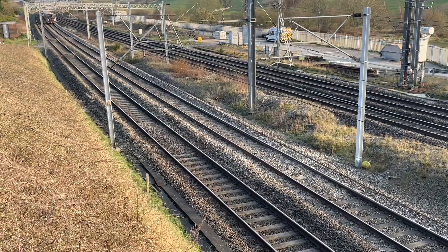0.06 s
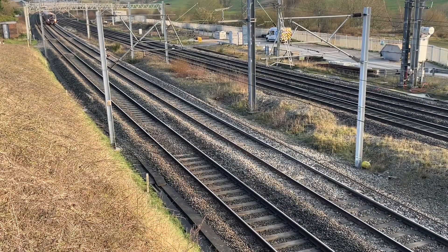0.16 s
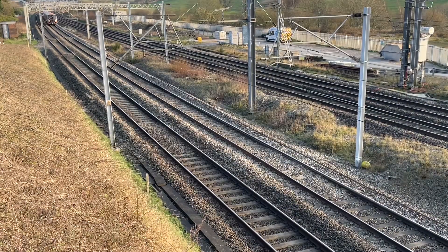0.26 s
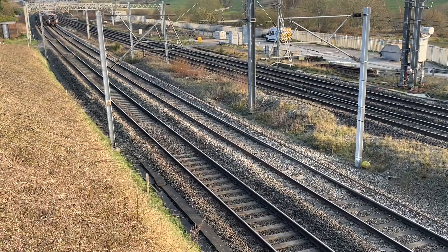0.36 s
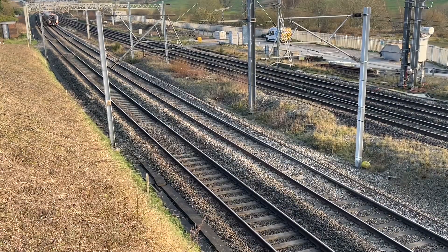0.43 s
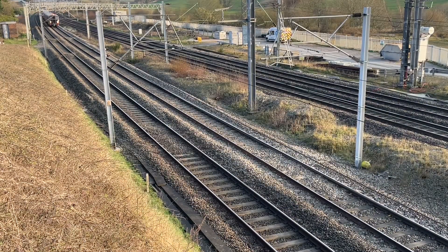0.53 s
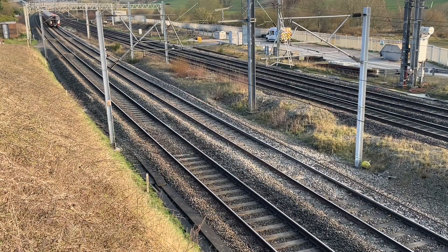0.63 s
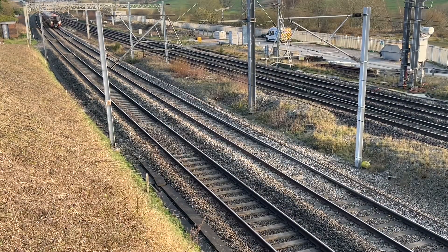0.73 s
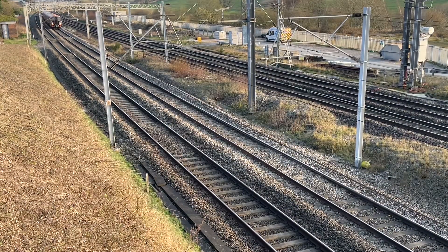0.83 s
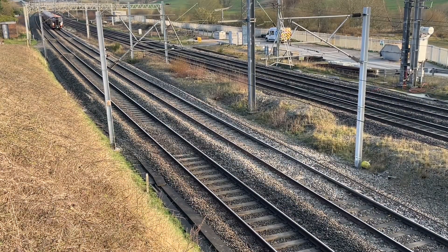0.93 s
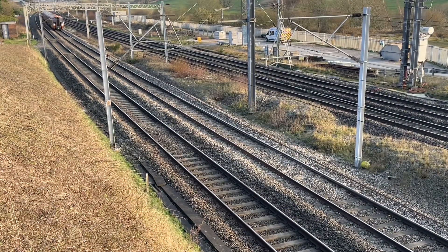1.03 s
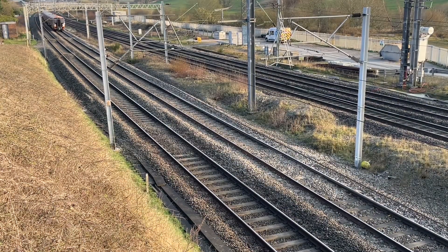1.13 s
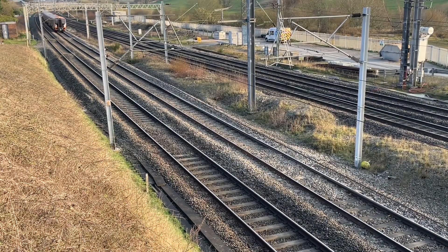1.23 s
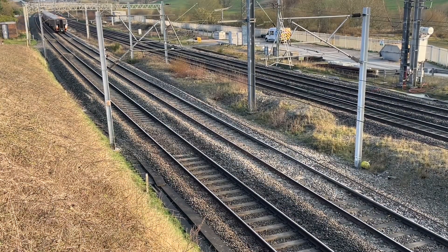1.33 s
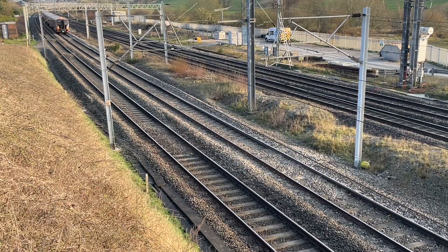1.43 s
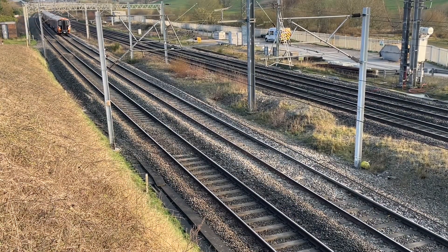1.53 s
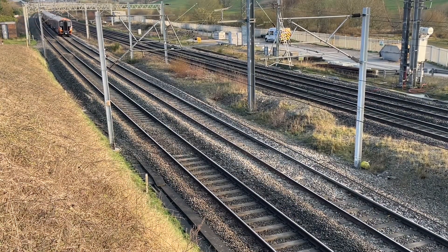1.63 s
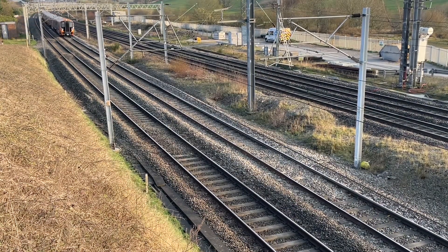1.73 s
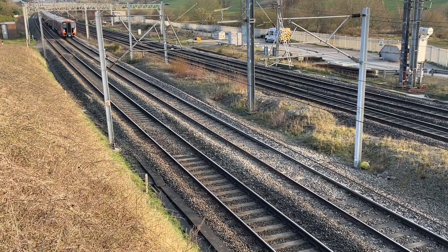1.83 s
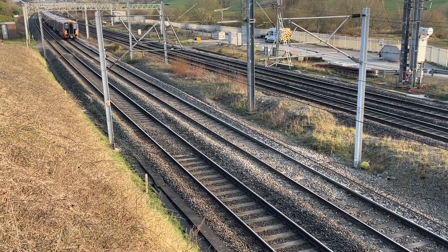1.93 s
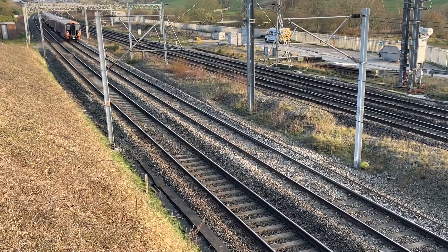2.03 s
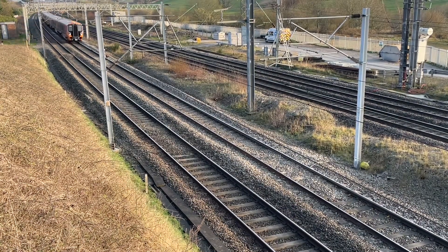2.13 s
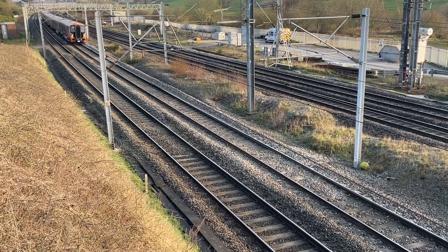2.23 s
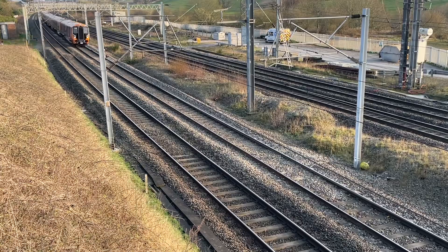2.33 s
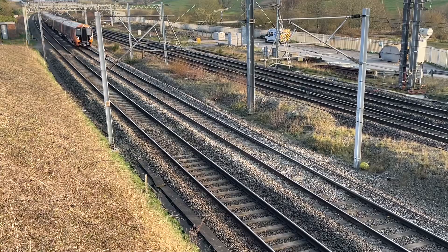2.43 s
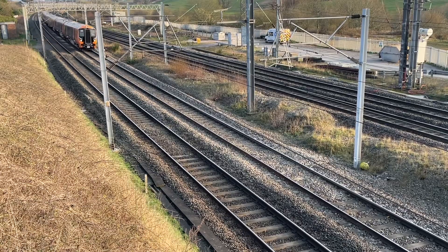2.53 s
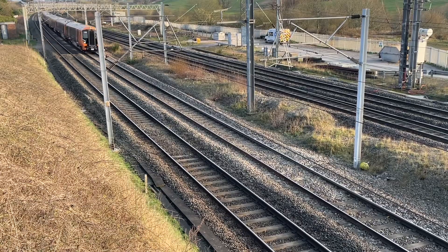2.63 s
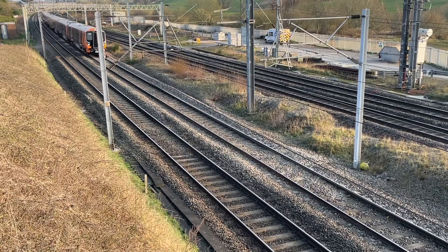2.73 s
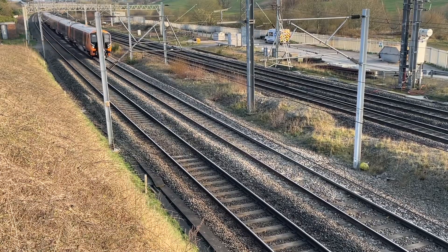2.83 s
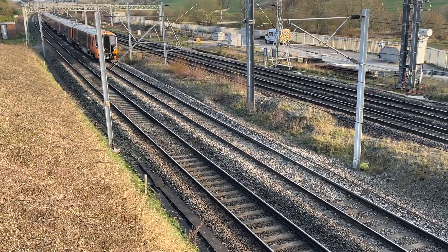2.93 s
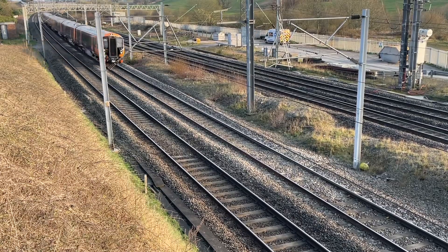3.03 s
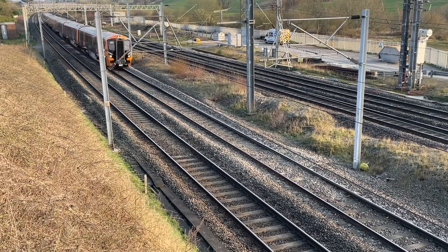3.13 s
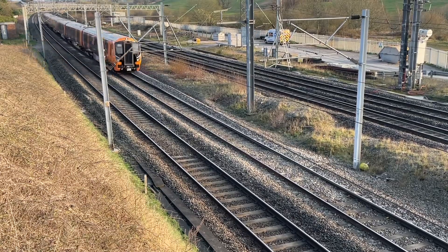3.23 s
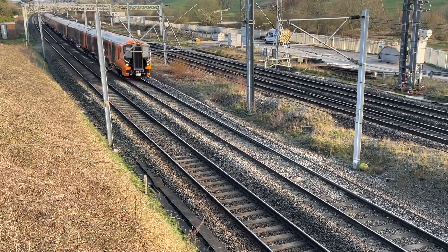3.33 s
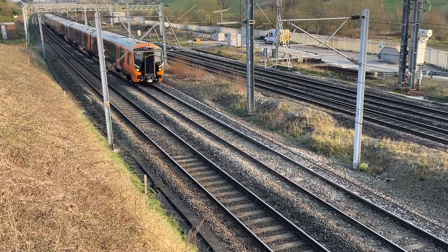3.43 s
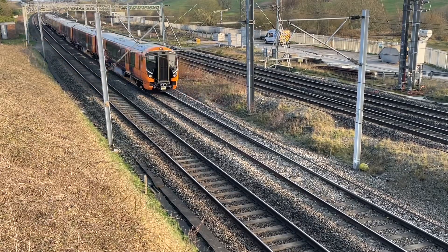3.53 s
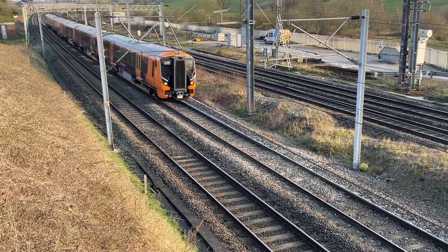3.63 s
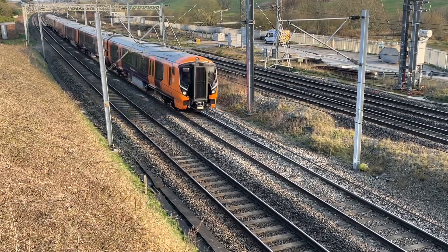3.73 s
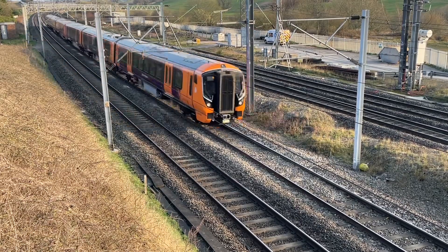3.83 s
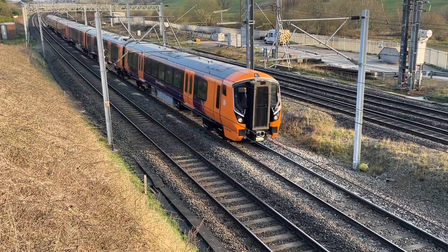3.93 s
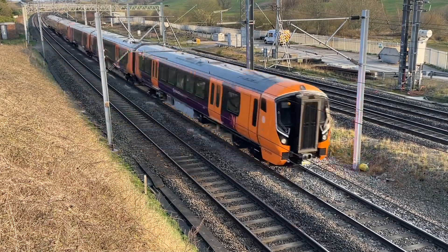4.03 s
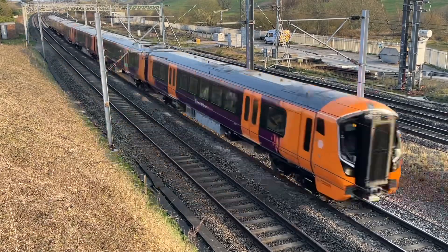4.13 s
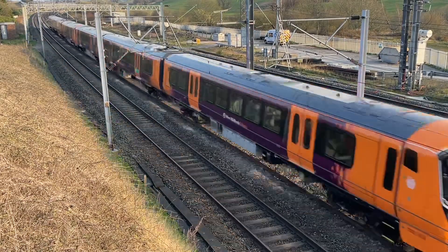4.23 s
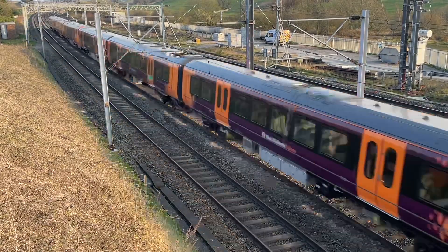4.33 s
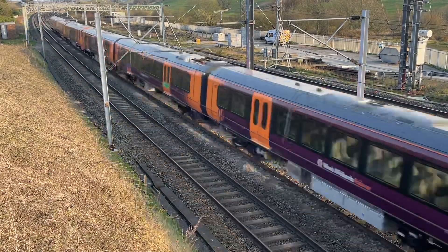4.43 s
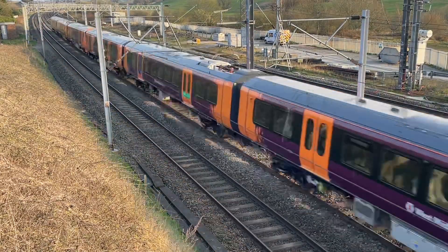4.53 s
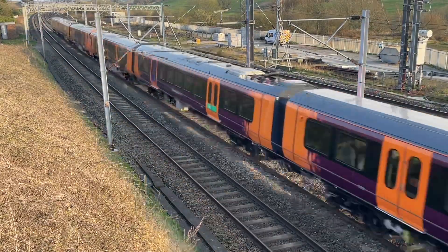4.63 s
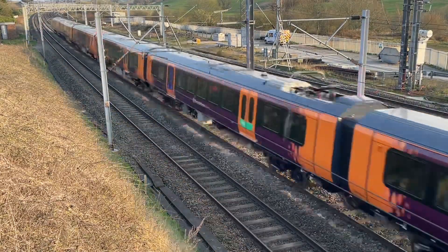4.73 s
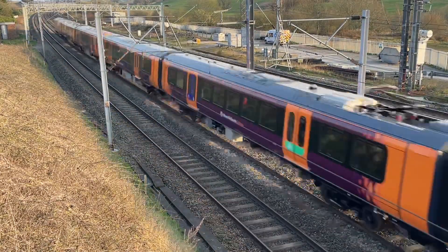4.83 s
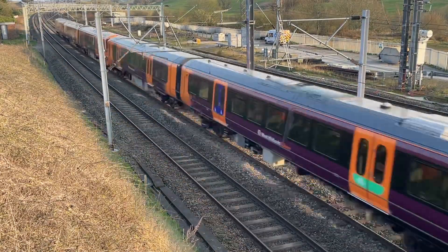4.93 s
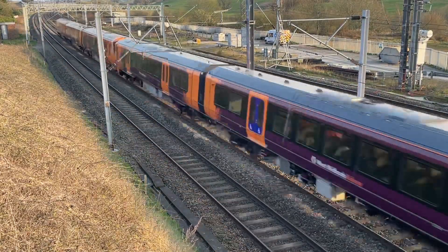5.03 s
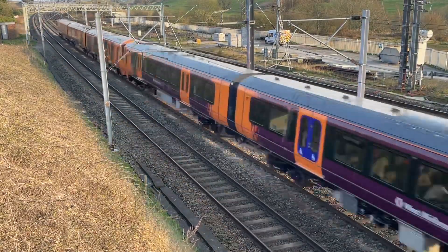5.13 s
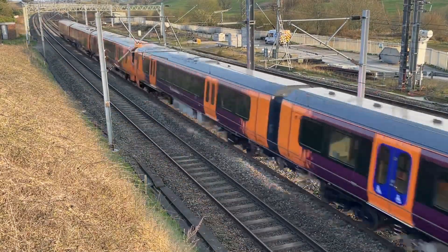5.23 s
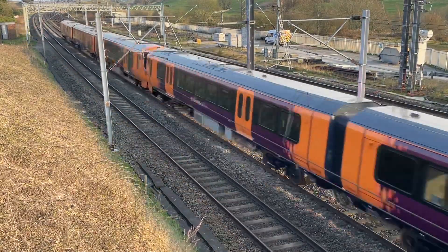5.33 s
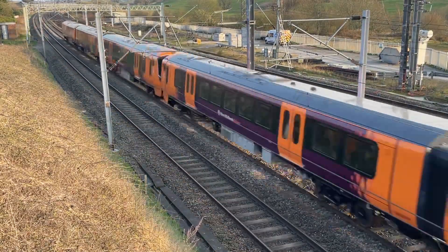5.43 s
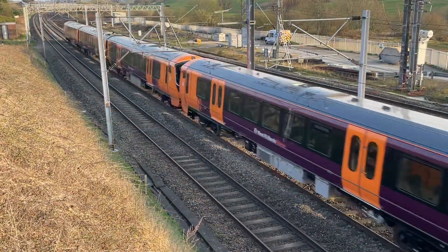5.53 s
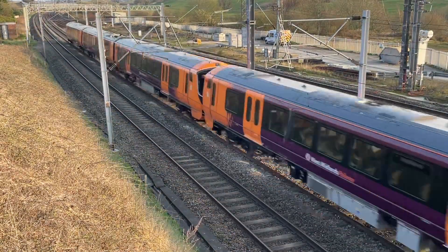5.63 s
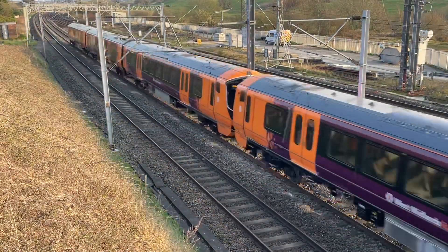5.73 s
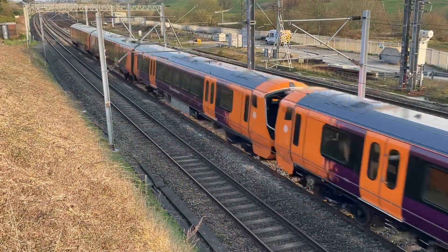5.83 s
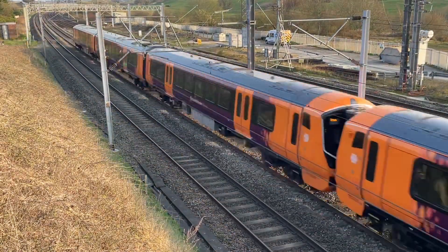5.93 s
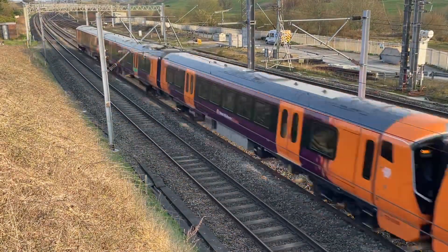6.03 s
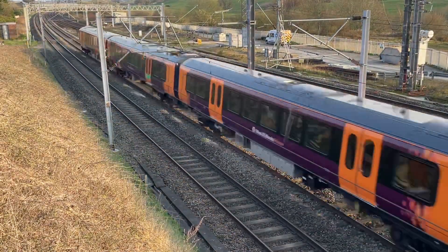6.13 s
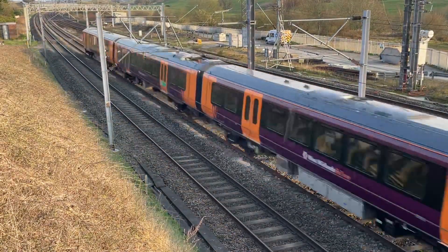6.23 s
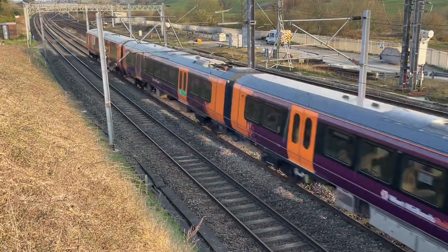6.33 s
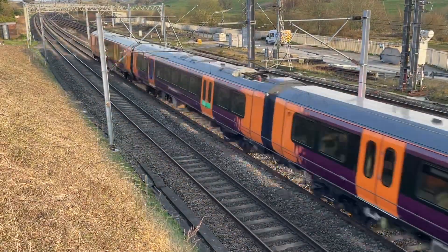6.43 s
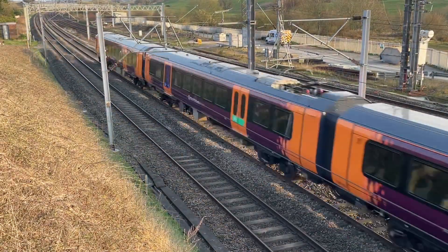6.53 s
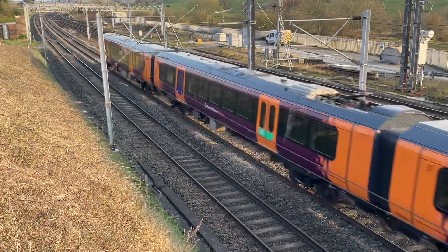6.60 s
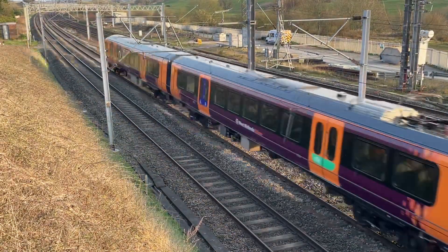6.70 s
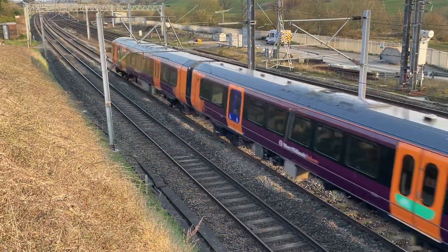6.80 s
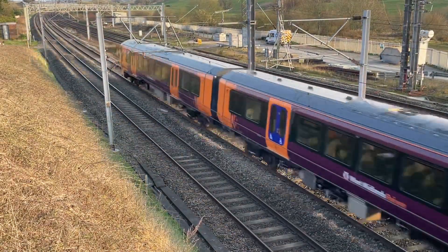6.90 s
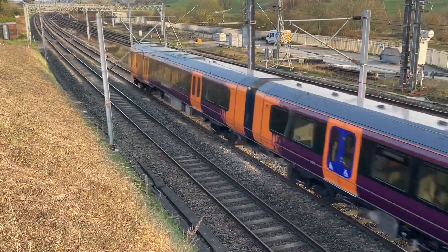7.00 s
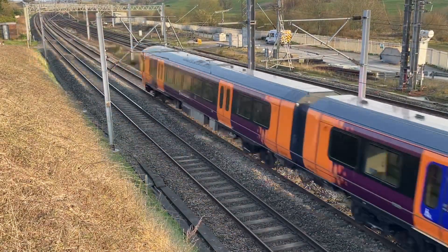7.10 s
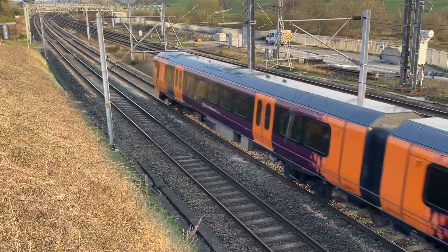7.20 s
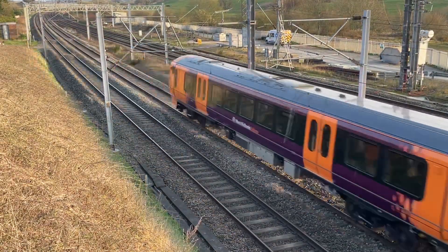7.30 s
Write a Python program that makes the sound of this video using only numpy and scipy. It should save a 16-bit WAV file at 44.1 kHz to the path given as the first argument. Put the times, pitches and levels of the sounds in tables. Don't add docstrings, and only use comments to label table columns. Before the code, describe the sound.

Mono, outdoors, in a field close beside a straight track. From 0 to 1.9 s it is quiet: a distant soft rolling rush, thin high singing in the rails, a faint wavering whistle in the first second, tiny falling bird calls near 0.3, 0.8 and 1.4 s, and low puffs of wind on the microphone. Around 2 s short falling metallic zips run along the rail; at 2.3-2.5 s a cluster of hollow clanks rings out. The roar rises, with short bursts of electric whine. A denser, brighter clatter comes at 3.5-3.7 s, with a last ring near 4.05 s, as tones slip slightly lower. From 4.2 s the train roars alongside, loud and broadband, with whine, wheel hiss and rumble swelling as bogies pass. Slipstream thumps heavily, strongest at 4.2-5 s, then more lightly. The roar stays strong, with uneven swells, until it stops at about 7.4 s, still passing.

```python
import sys
import numpy as np
from scipy import signal
from scipy.fft import rfft, irfft, next_fast_len
from scipy.io import wavfile
from scipy.ndimage import uniform_filter1d, map_coordinates

SR = 44100
rng = np.random.default_rng(int(sys.argv[2]) if len(sys.argv) > 2 else 0)


def ratio(d):
    e = np.asarray(d, float) / 20
    return 10 ** e


def unload_audio(sound):
    columns = np.transpose(np.atleast_2d(sound))
    steps = np.round(np.clip(columns, -1, 1) * 32767)
    wavfile.write(sys.argv[1], SR, steps.astype(np.int16))


N = 324576
HOP = 256

# time in seconds, nearness (0 far, 1 closing in, 2 alongside), roar in dB.
APPROACH = [(0, 0.12, -45), (.74, 0.22, -43), (1.5, 0.39, -41), (2.25, 0.6, -37.5), (2.55, 0.58, -35),
            (3.2, 0.78, -32.5), (3.5, 1.02, -30), (3.7, 0.91, -26.5), (4.05, 1.54, -25), (4.25, 1.66, -21),
            (4.5, 1.67, -19), (4.84, 1.93, -18.5), (5.25, 2.06, -17.5), (5.75, 2.06, -20),
            (6.08, 1.84, -21.5), (6.7, 1.76, -17), (7.1, 2.2, -19), (7.36, 2.8, -20.5)]
ROLLING_BANDS = [
    (90, 400),
    (400, 2600),
    (2600, 5200),
    (5200, 12500),
    (13200, 15500),
]
# level in dB far, closing in, alongside.
BAND_LEVELS = [
    (-6, -3.5, -7.5),
    (0.5, -0.5, 0),
    (-19, -14, -10),
    (-32, -17.5, -18),
    (-48, -47.5, -44.5),
]
# frequency in Hz, dB per Hz far, closing in, alongside.
ROLLING_COLOUR = [(40, -100, -92, -78), (85, -80, -75, -43.5), (134, -66, -52.5, -49), (252, -73.5, -59, -54.5),
                  (360, -72, -62.5, -55), (580, -71, -63, -52), (694, -73.5, -65, -55.5),
                  (815, -77.5, -62.5, -50), (1190, -75, -66.5, -51), (1280, -83, -69.5, -51),
                  (1855, -82, -65, -56), (1850, -86, -72.5, -58), (2390, -79.5, -71, -57.5),
                  (2770, -93, -69, -64),
                  (3250, -89, -73.5, -64), (3700, -100, -79, -62.5), (4200, -91.5, -67, -61),
               (4520, -101, -74.5, -60), (4930, -108, -84.5, -65.5), (5840, -104, -79.5, -70.5),
               (7250, -110, -91, -72), (9640, -110, -90.5, -81), (10650, -110, -100, -86.5),
               (11900, -109, -104, -94.5), (12900, -122, -114, -105), (14300, -115, -107, -100),
               (15700, -116, -108, -99)]
# frequency in Hz, width in Hz, level in dB over the noise.
RAIL_SONG = [(438, 40, 4), (2196, 38, 7), (2910, 55, 8), (6500, 60, 9), (7130, 60, 11), (7840, 150, 3),
             (8400, 100, 0), (8640, 130, 5), (9900, 280, 5), (9660, 80, 8), (10200, 80, 16),
             (10840, 68, 17), (11500, 200, 11), (13900, 90, 7)]
# time in seconds, frequency in Hz, width in Hz,
# level in dB over the roar, length in seconds.
BOGIE_BLOOMS = [(2.52, 2280, 250, 6, .1), (3.62, 2300, 600, 5, .12), (3.95, 9400, 350, 7, .4),
                (3.949, 7560, 300, 6, .35), (3.9, 6050, 600, 2, .5), (4.5, 201, 80, 5, .18),
                (4.92, 1450, 300, 2, .15), (5.6, 1420, 350, 4, .22), (6.75, 1450, 300, 4.5, .35),
                (5.4, 850, 140, 3, .2), (5.9, 850, 140, 1, .2), (7.0, 585, 100, 4, .4),
                (4.75, 580, 100, 3, .3), (7.15, 820, 100, 4, .12)]
# time in seconds, hiss swell in dB.
WHEEL_PASSES = [(4.05, -.5), (4.26, 2), (4.47, -.5), (4.86, 2.5), (5.1, 0), (5.3, -1), (5.62, 1.5),
                (5.85, -1), (6.12, 2), (6.35, -.5), (6.66, 1), (7.05, 0), (7.36, 4)]
# time in seconds, rumble swell in dB.
FRAME_PASSES = [(4.25, 4.5), (4.52, 2), (5.05, 2), (5.45, -3.5), (5.84, 2.5), (6.6, -2.5), (6.799, -1)]
# frequency in Hz approaching, in Hz alongside,
# level in dB under the roar far, closing in, alongside.
WHINE_TONES = [(585, 568, -30, -35, -23), (615.6, 597, -41, -18.5, -15.5), (840, 813, -28, -17, -40),
               (1235, 1179, -17.5, -15, -18), (2320, 2222, -19, -39, -17), (2400, 2347, -32, -23, -23)]
# time in seconds, lift in dB, half length in seconds.
MOTOR_LIFTS = [(2.4, 5, 0.35), (3.324, 8.5, .1), (4.4, 3.5, 0.53), (4.9, 0, .2), (6.1, 4, 0.23),
               (7.199, 1, 0.32)]
# time in seconds, level in dB, half length in seconds.
SING_BURSTS = [(2.495, -41, .03), (2.75, -39, .035), (2.87, -37, .03), (2.94, -41, .025), (3.03, -41, .02),
               (3.09, -42, .015), (3.19, -39, .025), (3.29, -38, .022), (3.35, -39, .015), (3.41, -40, .02),
               (3.49, -33, .02), (3.7, -40, .015), (3.78, -37, .015), (3.88, -37, .02), (3.98, -35, .03),
               (4.1, -35, .025), (4.24, -33, .08), (4.75, -38, .1), (6.1, -35, .2), (6.6, -35, .2)]
# peak in seconds, rms in dB, t60 in seconds, share of the second rail.
JOINT_BLOWS = [(1.97, -39, 0.12, 0.3), (2.03, -39, 0.12, .25), (2.295, -35, .2, .05), (2.33, -30, .2, .05),
               (2.39, -35, .25, .05), (2.495, -35, .36, .97), (3.53, -28, .33, .3), (3.6, -28, .3, .89),
               (3.635, -32, .2, .6), (3.68, -30, .3, .6), (3.84, -43, .27, .9), (3.89, -33, 0.25, .6),
               (4.06, -29.5, 0.47, 0.98)]
# frequency in Hz, width in Hz, level in dB.
FIRST_RAIL = [(458, 40, -10), (694, 92, 5), (880, 100, 2), (1060, 140, 1), (1254, 95, 4), (1450, 120, -4),
              (1745, 60, 3), (2200, 150, -14)]
# frequency in Hz, width in Hz, level in dB.
SECOND_RAIL = [(457, 50, -3), (680, 91, -8), (820, 120, 1), (990, 100, -2), (1180, 100, -8), (1450, 90, -6),
               (1730, 72, -3), (2160, 150, -11)]
# peak in seconds, frequency in Hz, rms in dB, t60 in seconds.
MODE_RINGS = [(2.267, 1765, -35, .2), (2.284, 1140, -33, .12), (2.299, 646, -31, .12),
              (2.3, 1190, -28, .12), (2.31, 1470, -38, .2), (2.32, 1280, -26, 0.15), (2.328, 1730, -31, .1),
              (2.33, 965, -23, 0.11), (2.33, 2110, -43, 0.073), (2.332, 704, -18, 0.083),
              (2.342, 1074, -25, 0.09), (2.36, 680, -25, .08), (2.372, 1100, -32, .1),
              (2.372, 1695, -40, .15), (2.395, 694, -27.5, 0.19), (2.397, 1280, -34, .2),
              (2.41, 1190, -34, .1), (2.476, 774, -34, .12), (2.494, 1000, -27.5, 0.11),
              (2.519, 1246, -38, .2), (2.552, 940, -32, .12), (3.524, 1765, -26, 0.085),
              (3.526, 1180, -25, 0.08), (3.538, 705, -24, .1), (3.556, 1220, -23, .1),
              (3.56, 465, -26.5, 0.33), (3.568, 818, -23, .1), (3.578, 1700, -22, 0.11),
              (3.58, 1410, -27, .15), (3.59, 1760, -27, .12), (3.59, 2250, -33, .15), (3.597, 955, -20, .1),
              (3.606, 805, -19, .15), (3.61, 1750, -25, .1), (3.63, 1620, -28, .12), (3.625, 817, -19, .1),
              (3.637, 820, -15.5, 0.065), (3.64, 2460, -37, .2), (3.645, 2720, -35, .15),
              (3.648, 1660, -32, .12), (3.658, 880, -24, 0.13), (3.674, 1010, -23, 0.18),
              (3.694, 828, -29, 0.12), (3.708, 840, -22, 0.087), (3.72, 1140, -34, .1),
              (3.73, 780, -30, 0.083), (3.84, 785, -26, 0.24), (4.06, 865, -23, 0.39)]
# peak in seconds, frequency in Hz, rms in dB, t60 in seconds,
# glide in Hz per second.
RAIL_ZIPS = [(1.94, 1660, -40, .06, -9000), (1.968, 1134, -33, .08, -11000), (2.025, 1220, -40, .1, -3000)]
# time in seconds, slow push in dB, flutter in dB, half length in seconds.
WIND_GUSTS = [(0.306, -24.5, -44, 0.15), (.21, -45, -44, .04), (.53, -45, -44, .06), (0.81, -17, -43, .06),
              (0.857, -40, -34, .025), (1.0, -33, -39.5, 0.043), (1.294, -17.5, -31, 0.021),
              (1.38, -30, -31, 0.042), (1.607, -22, -42.5, 0.18), (1.907, -15.5, -42, 0.042),
              (2.027, -17.5, -25, 0.038), (2.196, -18, -32, 0.037), (2.32, -35, -29, .03),
              (2.424, -18, -36, 0.048), (2.583, -30, -35, 0.046), (2.736, -22, -35, 0.069),
              (2.99, -27, -32, 0.11), (3.36, -17.5, -23, 0.029), (3.744, -17.5, -38, 0.065),
              (4.092, -13.5, -22, 0.089), (4.21, -12, -11, 0.014), (4.35, -7.5, -15.5, 0.056),
              (4.525, -4, -16, 0.046), (4.726, -11, -15, 0.053), (4.882, -9, -20, 0.057),
              (5.05, -30, -18, 0.042), (5.201, -33, -29, 0.044), (5.613, -12.5, -30, 0.026),
              (5.814, -29, -23, 0.029), (6.361, -21, -32, 0.059), (6.574, -20.5, -24, 0.079),
              (6.898, -24, -35, .05), (7.03, -19, -18.5, 0.031), (7.29, -29, -19, 0.035)]
# frequency in Hz, dB per Hz.
PUSH_COLOUR = [(1.8, -39), (3.0, 3), (16, 1.5), (30, -15.5), (39, -12), (66, -120)]
# frequency in Hz, dB per Hz.
FLUTTER_COLOUR = [(14, -55), (26, -0.5), (45, -6.5), (65, -3.5), (80, -18), (110, -27), (200, -120)]
# frequency in Hz, dB per Hz.
SLIP_COLOUR = [(14, -43), (26, 2.5), (60, -3.5), (90, -8.5), (130, -22.5), (250, -120)]
# time in seconds, frequency in Hz, level in dB.
FAR_CHIRP = [(0, 2450, -57), (.25, 2460, -59), (.32, 2420, -63), (.4, 2410, -52), (.5, 2420, -74),
             (.68, 2510, -59), (.8, 2510, -58), (.9, 2520, -80), (1.1, 2520, -120)]
# peak in seconds, frequency in Hz, rms in dB, t60 in seconds,
# glide in Hz per second.
BIRD_CALLS = [(.27, 5050, -71, .25, -3500), (.3, 4850, -74, .1, -15000), (.785, 4900, -73, .1, -25000),
              (1.422, 5000, -65, .1, -40000), (1.44, 4300, -67, .15, -12000)]
# frequency in Hz, dB per Hz.
AIR_COLOUR = [(3000, -120), (5000, 1), (9000, -7), (11500, 0), (12900, -5), (13600, 1), (15700, -1)]


def rolling(patchy_db=0.97, rail_fade=0.55):
    hz, t, spectrum = signal.stft(rng.standard_normal(N), SR, nperseg=8 * HOP, noverlap=7 * HOP)
    near = curves(APPROACH, t)[0]
    knots, *stages = np.transpose(ROLLING_COLOUR)
    stage_colours = [along(np.transpose([knots, stage]), hz)[:, None] for stage in stages]
    shape_db = staged(near, *stage_colours)
    song_db = sum(db / (1 + (2 * (hz - centre) / width) ** 2) for centre, width, db in RAIL_SONG)
    shape_db = shape_db + song_db[:, None] * np.clip(1 - rail_fade * near, 0, 1)
    for s, centre, width, db, length in BOGIE_BLOOMS:
        in_pitch = (2 * (hz[:, None] - centre) / width) ** 2
        in_time = (2 * (t - s) / length) ** 2 / 2
        shape_db = shape_db + db * np.exp(-in_pitch - in_time)
    patches = uniform_filter1d(rng.standard_normal(spectrum.shape), size=14, axis=0)
    patches = uniform_filter1d(patches, size=16, axis=1)

    power = ratio(2 * shape_db) / len(hz)
    band_power = [power[(hz >= lo) & (hz < hi)].sum(0) for lo, hi in ROLLING_BANDS]
    lift_db = band_levels(t) - 10 * np.log10(band_power)
    centres = np.log([np.sqrt(lo * hi) for lo, hi in ROLLING_BANDS])
    blend = np.array([np.interp(np.log(hz + 1), centres, row) for row in np.eye(len(ROLLING_BANDS))]).T
    gain = ratio(shape_db + blend @ lift_db + patchy_db * unit(patches))
    return signal.istft(spectrum * gain, SR, nperseg=8 * HOP, noverlap=7 * HOP)[1][:N]


def band_levels(t, pass_s=0.097):
    near, roar_db = curves(APPROACH, t)
    rumble, roar, sheen, hiss, fizz = [roar_db + staged(near, *stages) for stages in BAND_LEVELS]
    wheels = sum(db * bump(t, s, pass_s) for s, db in WHEEL_PASSES)
    frames = sum(db * bump(t, s, pass_s) for s, db in FRAME_PASSES)
    return np.array([rumble + frames, roar, sheen + 0.47 * wheels, hiss + wheels, fizz + 1.8 * wheels])


def whine():
    near, roar_db = curves(APPROACH)
    t = np.arange(N) / SR
    roar_db = roar_db + sum(db * bump(t, s, half) for s, db, half in MOTOR_LIFTS)
    out = np.zeros(N)
    for hz_in, hz_by, far_db, closing_db, by_db in WHINE_TONES:
        blur = 0.00296 * wobble(8) + 0.0031 * np.clip(near - 1, 0, 1) * wobble(40)
        pitch = dropped(hz_in, hz_by) * (1 + blur)
        flutter = unit((wobble(18) + 1.3) * ratio(1.3 * wobble(3.5)))
        level = ratio(roar_db + staged(near, far_db, closing_db, by_db) + 1.0)
        out += level * flutter * tone(pitch)
    return out


def sing():
    near, roar_db = curves(APPROACH)
    level = swells(SING_BURSTS, roar_db + staged(near, -28, -37, -20.5))
    pitch = dropped(1806, 1772) * (1 + 0.0025 * wobble(16))
    return level * ratio(3 + 1.3 * wobble(45)) * tone(pitch)


def clanks(spread_s=.025, dull_hz=3100, grit_db=-5):
    grit = noise(lambda f: (f > 1100) / (1 + (f / 2000) ** 6))
    first = noise(lambda f: rail_modes(FIRST_RAIL, f))
    second = noise(lambda f: rail_modes(SECOND_RAIL, f)) + ratio(grit_db) * grit
    t, out = np.arange(N) / SR, np.zeros(N)
    for s, db, t60, share in JOINT_BLOWS:
        colour = np.sqrt(1 - share) * first + np.sqrt(share) * second
        out += blow(t - s, db + 2.0, t60) * colour

    def path(f):
        late = np.exp(-2j * np.pi * spread_s * (1000 * np.log(f + 100) - f / 2))
        return late / (1 + (f / dull_hz) ** 4) / (1 + (400 / (f + 1)) ** 6)

    return filtered(np.roll(out, -round(spread_s * SR / 2)), path)


def rail_modes(joint, f):
    return np.sqrt(sum(np.abs(ratio(db) * f * width / (centre ** 2 - f ** 2 + 1j * f * width)) ** 2
                       for centre, width, db in joint))


def rail_rings():
    return rings(MODE_RINGS, rough_db=0.5, swell_share=0.04)


def zips():
    return rings(RAIL_ZIPS, rough_db=-2.0, swell_share=0.15)


def wind():
    near = curves(APPROACH)[0]
    push_gain = swells([(s, db, half) for s, db, _, half in WIND_GUSTS], staged(near, -45.5, -24, -25))
    flutter_gain = swells([(s, db, half) for s, _, db, half in WIND_GUSTS],
                          staged(near, -63.5, -26.5, -24.5))
    push, breeze, slip = [air_push(colour) for colour in (PUSH_COLOUR, FLUTTER_COLOUR, SLIP_COLOUR)]
    turn = np.pi / 2 * np.clip(near - 1, 0, 1)
    flutter = np.cos(turn) * breeze + np.sin(turn) * slip
    gusts = push_gain * push + flutter_gain * ratio(1.2 * wobble(8)) * flutter
    return gusts / (1 + (gusts / .75) ** 4) ** (1 / 4)


def air_push(colour):
    return steady(noise(lambda hz: ratio(along(colour, hz))), seconds=0.187)


def chirp():
    hz, db = curves(FAR_CHIRP)
    return ratio(db + 2.2 * wobble(21.4)) * tone(hz)


def birds():
    return rings(BIRD_CALLS, rough_db=0.0, swell_share=.1)


def still_air():
    return ratio(-72.5) * noise(lambda f: ratio(along(AIR_COLOUR, f)))


def dropped(hz_in, hz_by):
    return hz_in + (hz_by - hz_in) * (1 + np.tanh((np.arange(N) / SR - 3.7) / 0.472)) / 2


def tone(hz):
    return np.sin(2 * np.pi * np.cumsum(hz) / SR)


def blow(t, db, t60, swell_share=0.045):
    return ratio(db + np.where(t < 0, -4.3 * (t / (swell_share * t60)) ** 2, -60 * t / t60))


def rings(rows, rough_db, swell_share):
    out, t = np.zeros(N), np.arange(-SR // 10, SR // 2) / SR
    for s, hz, db, t60, *glide in rows:
        start = round(s * SR) - SR // 10
        cycles = hz * t + sum(glide) * t * t / 2
        out[start:start + len(t)] += blow(t, db - 0.5, t60, swell_share) * np.sin(2 * np.pi * cycles)
    return out * ratio(rough_db * wobble(70))


def bump(t, s, half):
    return np.exp(-((t - s) / half) ** 2 / 2)


def swells(rows, floor_db):
    t = np.arange(0, N, HOP) / SR
    bells = np.sqrt(sum((ratio(db) * bump(t, s, half)) ** 2 for s, db, half in rows))
    return np.hypot(ratio(floor_db), np.interp(np.arange(N) / SR, t, bells))


def staged(near, far, closing, alongside):
    return far + np.clip(near, 0, 1) * (closing - far) + np.clip(near - 1, 0, 1) * (alongside - closing)


def curves(rows, t=None):
    s, *columns = np.transpose(rows)
    t = np.arange(N) / SR if t is None else t
    return [np.interp(t, s, column) for column in columns]


def along(points, hz):
    f, v = np.transpose(points)
    return np.interp(np.log(hz + 1), np.log(f + 1), v)


def wobble(rate):
    return map_coordinates(rng.standard_normal(N // 50), [np.arange(N) * rate / SR])


def noise(response):
    return unit(filtered(rng.standard_normal(N), response))


def filtered(x, response):
    m = next_fast_len(N + SR // 2)
    return irfft(rfft(x, m) * response(np.fft.rfftfreq(m, 1 / SR)), m)[:N]


def steady(x, seconds):
    power = np.abs(uniform_filter1d(x ** 2, size=round(SR * seconds)))
    return unit(x / np.sqrt(power + 0.092))


def unit(x):
    return x / np.sqrt(np.mean(x ** 2) + 1e-20)


def scene():
    train = rolling() + whine() + sing() + clanks() + rail_rings() + zips()
    field = chirp() + birds() + still_air()
    return (train + wind() + field)[None]


def band_limit(x):
    return signal.sosfilt(signal.butter(12, 16490, fs=SR, output="sos"), x)


def record(dry):
    held = dry[0] / (1 + np.abs(dry[0] / 1.08) ** 8) ** (1 / 8)
    mix = filtered(held, lambda hz: hz < 15700)[None]
    return band_limit(mix)


dry = scene()
out = record(dry)
unload_audio(out)
```